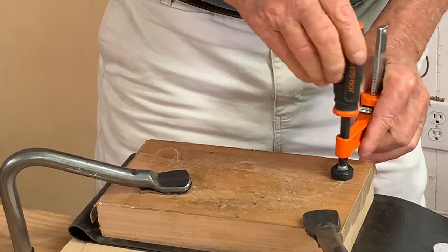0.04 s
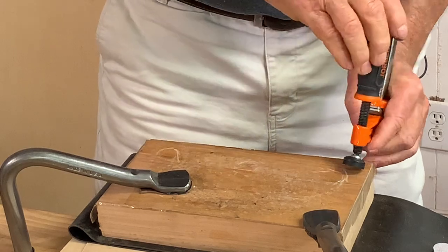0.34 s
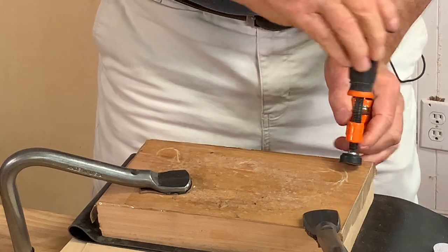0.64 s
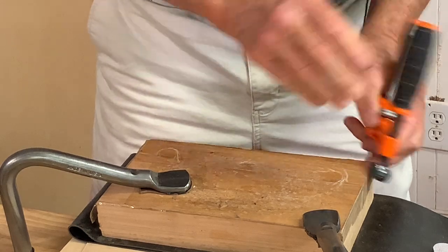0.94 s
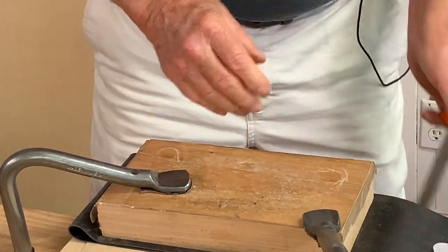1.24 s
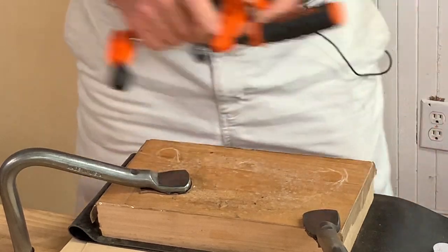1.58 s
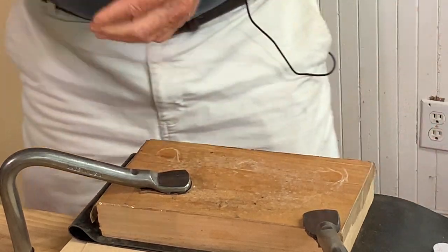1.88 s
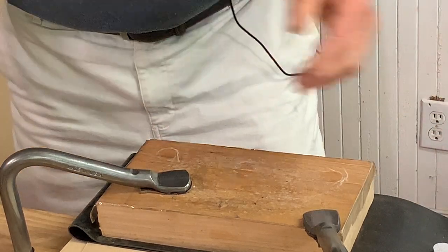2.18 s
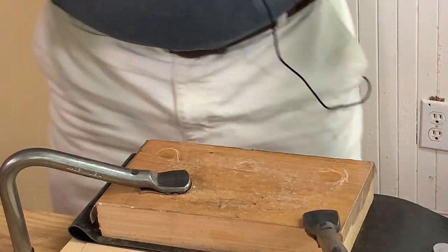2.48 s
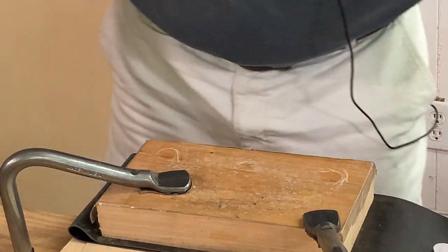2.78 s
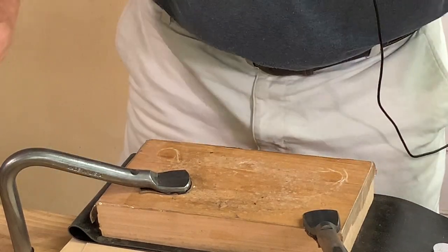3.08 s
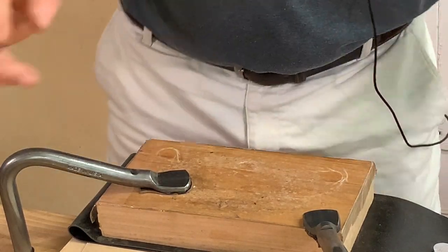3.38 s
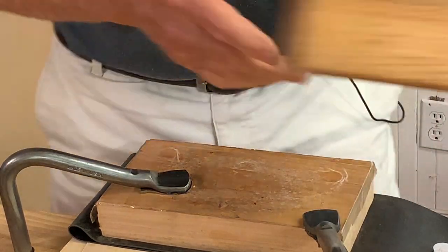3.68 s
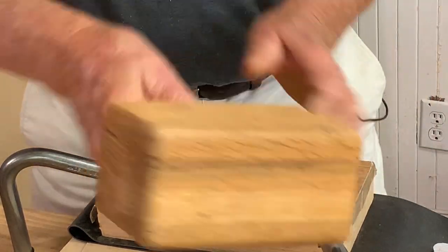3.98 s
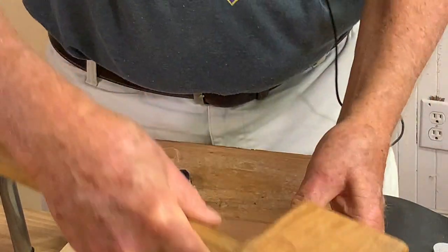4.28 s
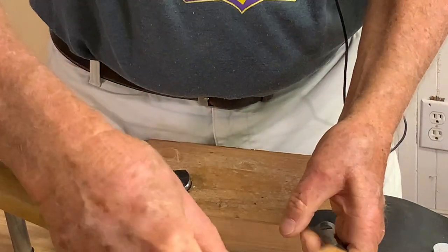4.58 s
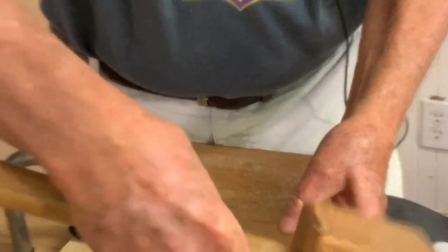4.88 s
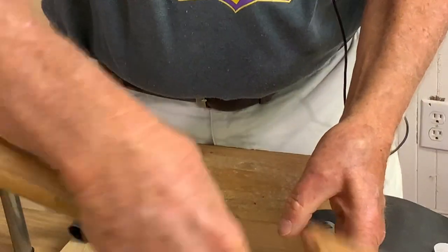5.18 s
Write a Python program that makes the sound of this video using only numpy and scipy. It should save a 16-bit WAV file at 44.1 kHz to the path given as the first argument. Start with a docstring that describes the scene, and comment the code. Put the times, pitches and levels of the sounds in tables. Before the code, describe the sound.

In a quiet workshop with a faint low rumble, a clamp ticks and scuffs softly as it is handled and lands on the workbench with a little clack. Nearby clothing swishes as someone moves. Near the end comes a light knock on wood, followed by two much louder mallet blows on a steel holdfast, with a short room echo.

```python
"""Clamp, mallet and holdfast at a workbench

A small bar clamp is unscrewed from a wooden press block, clicks in the hand and is laid down.
Clothes rustle as a wooden mallet is fetched; it taps once, then strikes a steel holdfast twice, hard.
Each impact excites damped modes and a crack of noise. A limiter ducks under the hard blows and
swells back, holding up the ring of the room."""
import sys
import numpy as np
from scipy import signal
from scipy.fft import rfft, irfft, next_fast_len
from scipy.io import wavfile
from scipy.ndimage import uniform_filter1d, minimum_filter1d, map_coordinates

SR = 44100
rng = np.random.default_rng(int(sys.argv[2]) if len(sys.argv) > 2 else 0)


def wav_out(sig):
    """Save sig, one row per channel (or a flat mono array), as 16-bit PCM at SR to the path in sys.argv[1]."""
    wavfile.write(sys.argv[1], SR, np.round(np.clip(np.atleast_2d(sig).T, -1, 1) * 32767).astype(np.int16))


N = 239725


def holdfast_blows():
    """Impact excitation: hard mallet blows drive the steel holdfast's heavily damped modes."""
    blows = [(4.88, 24.5, 16.5), (5.2503, 20.5, 12.5)]  # contacts: start_s, knock_db, crack_db
    modes = [(166.7, -3.5, 0.045), (252.4, 3, 0.027), (318, 1, 0.026), (467, -12, 0.011), (683, -4, 0.018),
             (830, -4.5, 0.022), (970, -1, 0.034), (1300, -12.5, 0.028), (1514, 0, 0.032),
             (1671, -1.5, 0.034), (2000, 0, 0.011), (2210, -8, 0.015), (3330, -10.5, 0.018),
             (4170, -11.5, 0.016), (5420, -16, 0.016), (6650, -12, 0.015)]  # holdfast resonances: pitch_hz, level_db, t60_s
    colour = [(25, -18), (60, 2), (200, 0), (700, -1.5), (1700, -4), (2800, -10.5), (4500, -18.5),
              (8000, -21.5), (11000, -21.5), (16000, -32.5)]  # contact noise spectrum: frequency_hz, level_db
    sound = knocks(blows, modes, colour, crack_t60=0.039, rise_cycles=0.98,
                   ring_room_db=-12.5, crack_room_db=-2.0)
    return sound * amp([[-9.3], [-8.7]])  # left, right


def mallet_tap():
    """Impact excitation: a light mallet tap sets the holdfast and bench ringing, with a dull thud."""
    tap = [(4.4045, -12, -17.5)]  # contact: start_s, knock_db, crack_db
    modes = [(72.8, -25.5, 1), (270, -10, 0.1), (351, -18, 0.19), (499, -7.5, 0.21), (560, -4.5, 0.092),
             (661, 5.5, 0.034), (790, -29, .06), (977, -6, 0.031), (1160, -2, 0.038), (1402, -12, 0.076),
             (1555, -11, 0.082), (1870, -16, 0.044)]  # resonances of the tapped holdfast and bench: pitch_hz, level_db, t60_s
    colour = [(25, -3), (120, 2), (800, 7.5), (1600, -8.5), (2500, -16), (5000, -21.5), (9500, -18.5),
              (16000, -36)]  # contact noise spectrum: frequency_hz, level_db
    sound = knocks(tap, modes, colour, crack_t60=0.08, rise_cycles=0.81,
                   ring_room_db=-8.5, crack_room_db=1.5)
    return sound * amp([[-2.4], [-1.1]])  # left, right


def clamp_landing():
    """Repeated impact: each contact of the clamp rings the bench's modes and adds a metal clack."""
    landing = [(2.072, -24.5, -26.5), (2.0755, -20, -25), (2.135, -26, -25), (2.14, -27, -25.5),
               (2.154, -30.5, -35)]  # contacts: start_s, knock_db, clack_db
    modes = [(109, -10, 0.2), (284, -2.5, 0.078), (420, -0.5, 0.034), (467.5, 2, 0.069), (577, -0.5, 0.048),
             (746, -5, 0.14), (895, -12.5, 0.067), (1240, -16.5, 0.13), (1585, -16.5, 0.056)]  # bench resonances: pitch_hz, level_db, t60_s
    colour = [(30, -2), (150, 10.5), (700, 9.5), (1400, -1), (2300, -11), (4000, -2.5), (7500, -7),
              (10000, -10.5), (16000, -32)]  # contact noise spectrum: frequency_hz, level_db
    return amp(-7) * knocks(landing, modes, colour, crack_t60=0.028, rise_cycles=0.62,
                            ring_room_db=-1.0, crack_room_db=-3.0)


def knocks(contacts, modes, colour, crack_t60, rise_cycles, ring_room_db, crack_room_db):
    """Modal superposition: each contact gives a sum of decaying sines and a short crack of noise."""
    out, t = np.zeros((2, N)), np.arange(SR // 3) / SR
    # summed over all directions, a crack has a smooth spectrum
    smooth = unit(coloured(signal.unit_impulse(len(t)), colour))
    for start_s, knock_db, crack_db in contacts:
        ring = np.zeros(len(t))
        for hz, db, t60 in modes:
            swell = 1 - np.exp(-(t * hz / rise_cycles) ** 2)  # low modes take longer to build up
            detuned_hz = hz * (1 + 0.0095 * rng.normal())
            envelope = amp(db + rng.normal()) * swell * fade(t, t60)
            ring += envelope * np.sin(2 * np.pi * detuned_hz * t + rng.uniform(0, 2 * np.pi))
        burst = rng.standard_normal(len(t)) * fade(t, crack_t60)
        crack = amp(crack_db) * punch(coloured(burst, colour))
        add(out, start_s, amp(knock_db) * punch(ring), ring_room_db)
        add(out, start_s, crack, crack_room_db, spread=smooth * np.std(crack))
    return out


def clamp_clicks(gain_db=-7, ring_db=-6, ring_t60=0.021, room_db=-9):
    """Small bodies resonate high: loose steel parts tick together with a snap and a brief ring."""
    clicks = [(0.0358, -50, 7500), (0.275, -48.5, 4470), (0.7793, -56, 6100), (0.8505, -41.5, 6230),
              (0.856, -48, 7360), (1.034, -46, 7700), (1.0905, -48, 7650), (2.068, -35, 5460),
              (2.074, -22.5, 7600), (2.123, -34, 4860), (2.136, -31.5, 5600), (2.173, -37.5, 6000),
              (3.1537, -46.5, 4310), (3.1677, -47, 4100), (3.1798, -45, 8600), (4.4134, -30.5, 8500),
              (4.4215, -31, 5660)]  # ticks of screws, jaws and other steel: start_s, level_db, pitch_hz
    out, t = np.zeros((2, N)), np.arange(SR // 8) / SR
    for start_s, db, hz in clicks:
        burst = rng.standard_normal(len(t)) * fade(t, t60=0.01)
        snap = coloured(burst, [(500, 5), (2000, 8), (hz, 20), (15000, 4)])
        ring = np.sin(2 * np.pi * hz * t) * fade(t, ring_t60)
        click = punch(punch(snap) + amp(ring_db) * punch(ring))
        add(out, start_s, amp(db + gain_db) * click, room_db)
    return out


def bumps(gain_db=-6, scuff_db=-6, room_db=-5):
    """Damped oscillation: each padded contact excites one resonance and a dull scuff."""
    contacts = [(0.024, -42.5, 118), (0.7974, -41.5, 510), (0.809, -31.5, 81), (0.812, -40, 265),
                (0.825, -36.5, 142.5), (1.5035, -46, 1096), (1.5043, -37, 277), (1.516, -35.5, 127),
                (2.139, -26, 167), (2.778, -44, 1224), (2.782, -45, 453), (2.824, -38, 182),
                (3.252, -39.5, 1370), (3.457, -40.5, 107.3), (4.03, -39.5, 96), (4.105, -35, 91.2),
                (4.415, -12.5, 282), (4.463, -24, 328), (4.525, -22, 329)]  # bumps of hands, tools and bench: start_s, level_db, pitch_hz
    out, t = np.zeros((2, N)), np.arange(SR // 3) / SR
    for start_s, db, hz in contacts:
        decay = fade(t, t60=0.083 * (194 / hz) ** 0.64)  # low pitches ring longer
        body = np.sin(2 * np.pi * hz * t) * decay * (1 - np.exp(-t * hz))
        burst = rng.standard_normal(len(t)) * decay
        scuff = coloured(burst, [(30, -15), (hz, 0), (3 * hz, -13), (16000, -62)])
        add(out, start_s, amp(db + gain_db) * (punch(body) + amp(scuff_db) * punch(scuff)), room_db)
    return out


def scraping(grain_db=3):
    """Sliding friction: the clamp's pad, and later the mallet, drag over wood in dull, uneven slips."""
    drags = [(0.725, 0.025, -43.5), (0.81, .05, -44.5), (0.93, 0.024, -43.5), (3.83, 0.098, -45)]  # strokes over wood: start_s, length_s, level_db
    slips = unit(amp(grain_db * wobble(80)))
    wood = rush([(30, -36), (60, 10), (150, 4.5), (280, -5), (600, -9), (1400, -23),
                 (3000, -58), (8000, -48)])
    return amp(strokes(drags, attack_s=0.044, release_s=0.11)) * slips * wood


def clothes(grain_db=1.56, mono=0.69, rest_rub_db=-74, rest_hiss_db=-73):
    """Stick-slip friction: cloth fibres catch and slip in a rub, a hiss and a fine fizz."""
    swishes = [(0.098, 0.074, -82, -68, -73), (0.45, 0.038, -64.5, -64.5, -79),
               (0.759, 0.15, -71, -66, -80), (1.045, 0.055, -68.5, -64.5, -82), (1.25, 0.19, -81, -75, -90),
               (1.531, 0.041, -64, -68, -72), (1.657, 0.078, -63, -64, -73.5),
               (1.947, 0.088, -74, -64.5, -77), (2.459, .015, -64, -65.5, -79), (2.766, .01, -66, -67, -72),
               (2.892, .04, -64.5, -61, -71), (2.978, 0.036, -53, -59, -66),
               (3.034, 0.026, -46, -52, -57.5), (3.122, 0.1, -55.5, -59, -65),
               (3.264, 0.036, -45, -48, -51), (3.363, 0.042, -55.5, -54.5, -58),
               (3.425, 0.054, -47, -48.5, -51.5), (3.523, 0.016, -49, -53.5, -58),
               (3.675, .18, -62.5, -59, -63.5), (3.895, 0.047, -66, -65.5, -67),
               (3.994, 0.079, -55.5, -61.5, -72), (4.184, 0.051, -65, -60.5, -74),
               (4.367, 0.014, -62, -58, -69), (4.789, 0.073, -62.5, -51.5, -57),
               (5.15, 0.024, -58, -45, -48)]  # body movements: start_s, length_s, rub_db, hiss_db, fizz_db
    # cloth noise spectra, low to high: frequency_hz, level_db
    rub_colour = [(200, -49), (450, 1), (800, 5), (1500, 8.5), (2300, 0.5), (3200, -25), (5000, -16),
                  (12000, -17)]
    hiss_colour = [(1500, -15.5), (2700, 1), (4200, 5), (6000, 0), (9500, 0.5), (12000, -18), (16000, -15)]
    fizz_colour = [(6000, -25), (9500, 9), (12500, 8), (16000, -1)]
    start_s, length_s, *levels = np.transpose(swishes)
    rub_gain, hiss_gain, fizz_gain = [
        amp(strokes(zip(start_s, length_s, db), attack_s=0.03, release_s=0.097)) for db in levels]
    grain = unit(amp(grain_db * wobble(350) + 1.1 * wobble(45)))
    rub = np.hypot(rub_gain, amp(rest_rub_db)) * rush(rub_colour, mono)  # never quite still
    hiss = np.hypot(hiss_gain, amp(rest_hiss_db)) * rush(hiss_colour, mono)
    fizz = fizz_gain * rush(fizz_colour, mono)
    return grain * (rub + hiss + fizz)


def workshop(rumble_db=-51.5, air_db=-77):
    """Background noise: the room's low, slightly restless rumble and a faint hiss."""
    rumble_colour = [(15, -21), (25, -69), (48, -0.5), (91, 0.5), (125, 0), (270, -12), (314, -10.5),
                     (550, -17.5), (593, -18), (742, -18.5), (929, -23), (1760, -29.5), (2200, -34),
                     (2860, -45), (4840, -120)]  # room noise spectrum: frequency_hz, level_db
    air = rush([(500, -21), (2000, 1), (5000, 0), (10000, -12), (11500, -29), (16000, -32)])
    return amp(rumble_db + 2.14 * wobble(5.524)) * rush(rumble_colour) + amp(air_db) * air


def add(out, start_s, sound, room_db, spread=None):
    """Reverberation: mix in the direct sound and the walls' answer to what it spreads into the room."""
    decay_times = [(80, 0.56), (300, 0.63), (1500, 0.6), (4000, 0.57), (9000, 0.47), (16000, 0.36)]  # reverberation times: frequency_hz, t60_s
    hz, t, spectra = signal.stft(stereo_noise(SR), SR, nperseg=256)
    tail = signal.istft(spectra * fade(t, along(decay_times, hz)[:, None]), SR, nperseg=256)[1]
    tail *= 1 - np.exp(-(np.arange(tail.shape[1]) / SR / 0.00036) ** 2)  # the reflections swell in
    spread = sound if spread is None else spread
    heard = signal.fftconvolve(spread[None], amp(room_db) * tail / np.linalg.norm(tail[0]), axes=1)
    heard[:, :len(sound)] += sound
    start = round(start_s * SR)
    out[:, start:start + heard.shape[1]] += heard[:, :N - start]


def stereo_noise(n):
    """Channel correlation: left and right are nearly alike in bass and treble, wide in the midrange."""
    likeness = [(60, .995), (130, .97), (290, .65), (640, .2), (1400, .3), (2200, .75), (2800, .99),
                (4000, .9), (7000, .9), (15000, .87)]  # likeness of left and right: frequency_hz, correlation
    angle = lambda hz: np.arccos(np.clip(along(likeness, hz), -1, 1)) / 2
    weights = lambda hz: np.array([np.cos(angle(hz)), np.sin(angle(hz))])
    mid, side = filtered(rng.standard_normal((2, n)), weights)
    return np.array([mid + side, mid - side])


def rush(spectrum, mono=0):
    """Spectral shaping: coloured stereo noise of rms 1; a near source has a large mono share."""
    noise = np.sqrt(1 - mono) * stereo_noise(N) + np.sqrt(mono) * rng.standard_normal(N)
    return unit(filtered(noise, lambda hz: amp(along(spectrum, hz))))


def strokes(rows, attack_s, release_s):
    """Power summation: the level in dB of strokes that rise 20 dB per attack_s, fall 20 per release_s."""
    t = np.arange(N) / SR
    power = np.zeros(N)
    for start_s, length_s, db in rows:
        away = np.maximum(start_s - t, 0) / attack_s + np.maximum(t - start_s - length_s, 0) / release_s
        near = away < 10
        power[near] += amp(db - 20 * away[near]) ** 2
    return 10 * np.log10(power + 1e-20)


def coloured(x, spectrum, size=4096):
    """Minimum-phase filtering: x takes on a (frequency_hz, level_db) colour with no pre-echo."""
    cepstrum = irfft(np.log(amp(along(spectrum, np.fft.rfftfreq(size, 1 / SR)))))
    cepstrum[1:size // 2] *= 2
    cepstrum[size // 2:] = 0
    impulse_response = irfft(np.exp(rfft(cepstrum)))
    return signal.fftconvolve(x, impulse_response)[:len(x)]


def filtered(x, response):
    """Linear filtering: the spectrum of x times a complex response of frequency."""
    n = x.shape[-1]
    padded = next_fast_len(n + SR // 4)
    return irfft(rfft(x, padded) * response(np.fft.rfftfreq(padded, 1 / SR)), padded)[..., :n]


def along(points, hz):
    """Interpolation of (frequency_hz, value) points on a log frequency axis."""
    frequencies, values = np.transpose(points)
    return np.interp(np.log(hz + 1), np.log(frequencies + 1), values)


def wobble(rate_hz):
    """Random modulation: a smooth curve through rate_hz knots a second."""
    knots = rng.standard_normal(int(N * rate_hz / SR) + 4)
    return map_coordinates(knots, [np.arange(N) * rate_hz / SR])


def fade(t, t60):
    """Exponential decay, 60 dB down at t60 seconds."""
    return np.exp(-np.log(1000) * t / t60)


def punch(x):
    """Onset normalisation: the first 10 ms have rms 1."""
    return x / np.sqrt(np.mean(x[:SR // 100] ** 2))


def unit(x):
    """Normalisation to rms 1."""
    return x / np.sqrt(np.mean(x ** 2) + 1e-20)


def amp(db):
    """Decibels to amplitude ratio."""
    return 10 ** (np.asarray(db) / 20)


def scene():
    """Superposition: all sources add in the two channels."""
    impacts = clamp_landing() + mallet_tap() + holdfast_blows() + clamp_clicks() + bumps()
    return impacts + clothes() + scraping() + workshop()


def limiter(x, ceiling_db=-6, hold_s=0.11, release_db_per_s=95):
    """Automatic gain control: gain drops at once under a loud blow, waits, then climbs back steadily."""
    power = np.abs(uniform_filter1d(np.mean(x ** 2, axis=0), size=264))
    needed_db = np.minimum(0, ceiling_db - 10 * np.log10(power + 1e-12))
    half_hold = int(hold_s * SR) // 2
    held_db = minimum_filter1d(needed_db, 2 * half_hold + 1, origin=half_hold)
    climb_db = release_db_per_s * np.arange(N) / SR
    gain_db = np.minimum.accumulate(held_db - climb_db) + climb_db
    return x * amp(uniform_filter1d(gain_db, size=44))


def record(dry):
    """All-pass phase shift on the left channel, then limiting, soft saturation and a band limit."""
    twist_hz, twist_width_hz, top_hz = 2790, 1350, 16100
    pole = lambda hz: twist_hz ** 2 - hz ** 2 + 1j * hz * twist_width_hz
    left = filtered(dry[0], lambda hz: np.conj(pole(hz)) / pole(hz))  # opposes the right near twist_hz
    limited = limiter(np.array([left, dry[1]]))
    rounded = limited / (1 + np.abs(limited / 0.88) ** 4) ** (1 / 4)
    return filtered(rounded, lambda hz: hz < top_hz)


dry = scene()
out = record(dry)
wav_out(out)
```